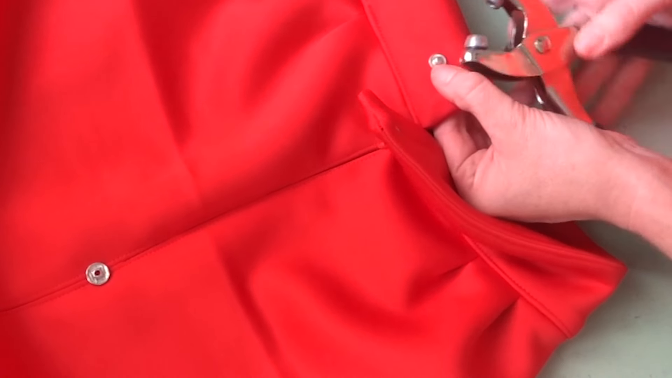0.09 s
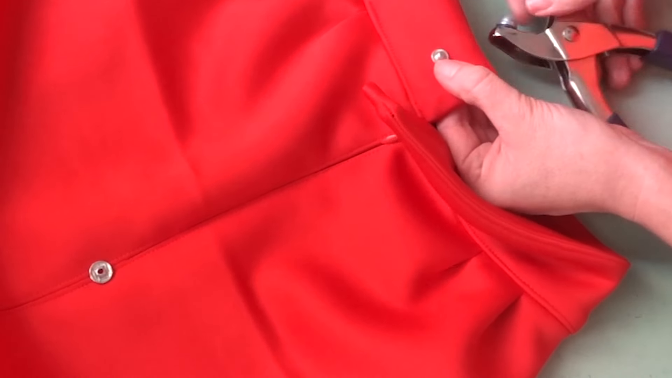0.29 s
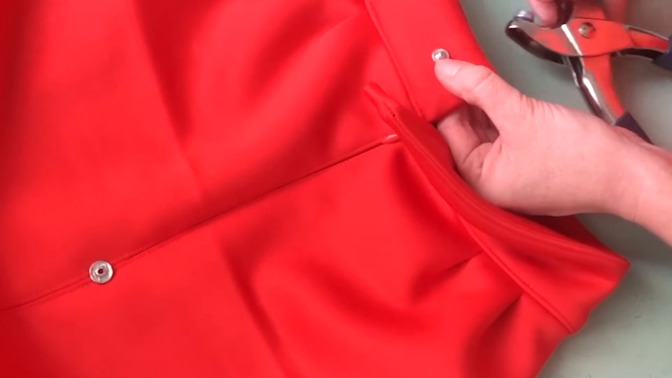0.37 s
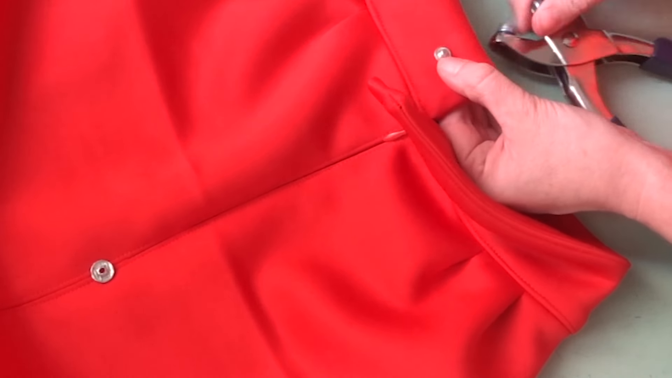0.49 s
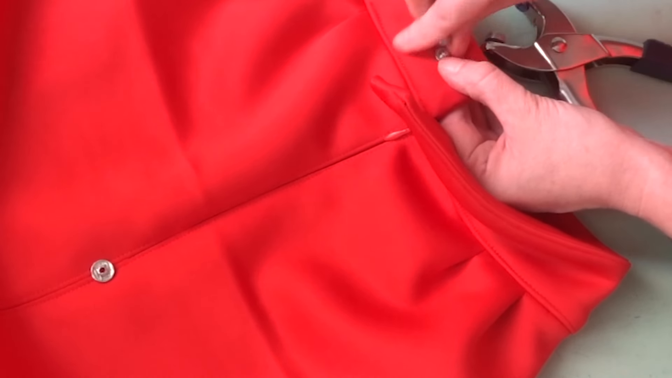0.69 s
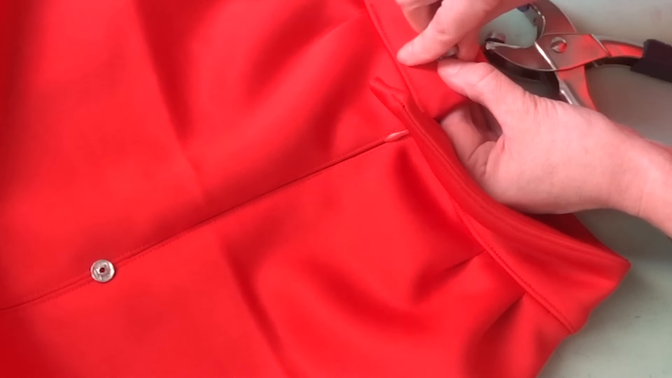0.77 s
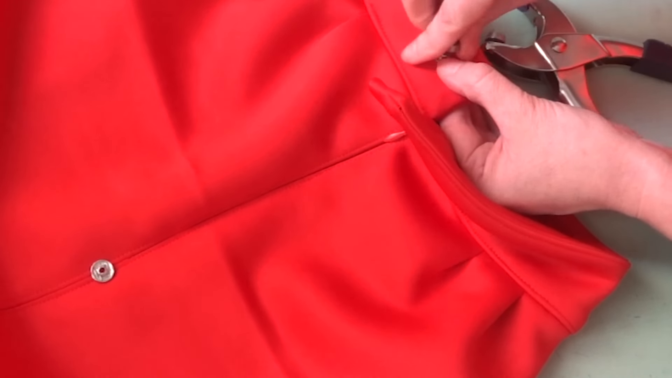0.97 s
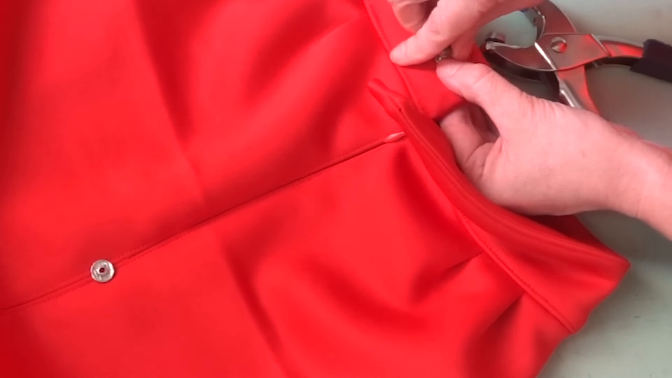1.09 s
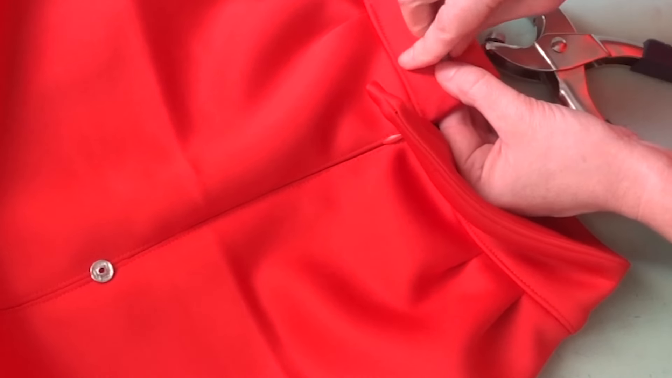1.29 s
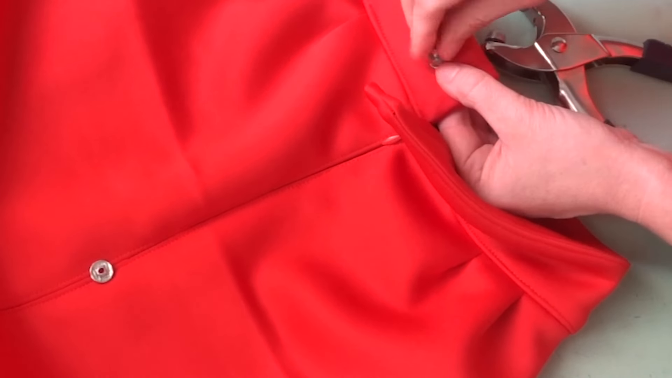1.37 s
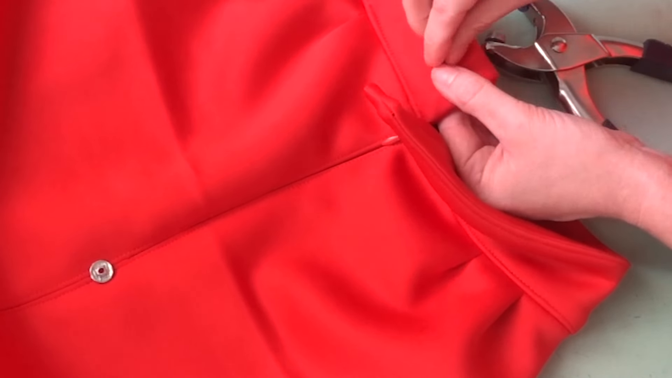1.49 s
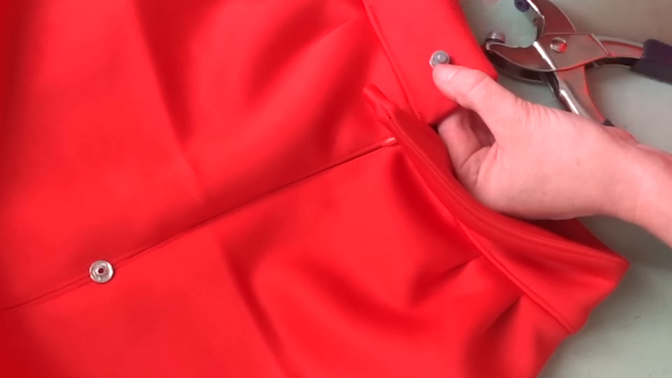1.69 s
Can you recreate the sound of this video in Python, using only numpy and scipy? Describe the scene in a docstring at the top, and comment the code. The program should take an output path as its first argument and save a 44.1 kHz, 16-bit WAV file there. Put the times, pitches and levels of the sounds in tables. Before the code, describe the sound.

Snap pliers give two hard metallic clacks and a heavier knock, then fingers rub neoprene.

```python
"""Close stereo pair at a table in a small, bare room. From the start a quiet air and hum lie under dull garment shifts
and fingers stroking neoprene, made of coloured noise, fibre grains and a rubbing resonance; loose metal ticks faintly.
Snap pliers then give two hard clacks and, laid down, a heavier knock: each is a contact, a crack,
reflections, ringing table, room and steel modes, and a noise tail. A soft hand bump and more strokes follow."""
import sys
import numpy as np
from scipy import signal
from scipy.fft import rfft, irfft, next_fast_len
from scipy.io import wavfile
from scipy.ndimage import uniform_filter1d

SR = 44100
rng = np.random.default_rng(int(sys.argv[2]) if len(sys.argv) > 2 else 0)


def dump_mix(stems):
    """Bounce the given channels to the path in sys.argv[1] as a 16-bit WAV at rate SR."""
    frames = np.atleast_2d(stems).T  # one column per channel
    limited = np.clip(frames, -1, 1)  # hard clip at full scale
    pcm = np.round(limited * 32767).astype(np.int16)
    wavfile.write(sys.argv[1], SR, pcm)


N = 77175


def undb(db):
    """Decibels to gain."""
    return 10 ** (np.asarray(db) / 20)


def unit(x):
    """Scale to an energy of 1."""
    return x / np.sqrt(np.sum(x ** 2) + 1e-18)


def level(x, db):
    """Scale to an rms level."""
    return x * undb(db) / np.sqrt(np.mean(x ** 2))


def level_50ms(x, db):
    """Scale a short event from energy 1 to the given rms level over 50 ms."""
    return x * undb(db) * np.sqrt(SR / 20)


def colour(x, points):
    """Causal minimum-phase filter through (Hz, dB) points, by folding the cepstrum."""
    size = 2 * next_fast_len(len(x))
    hz, db = np.array(sorted(points), float).T
    f = np.maximum(np.arange(size // 2 + 1) * SR / size, 1)
    gain = undb(np.interp(np.log(f), np.log(hz), db))
    cepstrum = irfft(np.log(gain))
    cepstrum[1:size // 2] *= 2
    cepstrum[size // 2 + 1:] = 0
    response = np.exp(rfft(cepstrum))
    return irfft(rfft(x, size) * response)[:len(x)]


def resonate(x, hz, width):
    """One resonance with gain 1 at its centre; width in Hz."""
    b, a = signal.iirpeak(hz, hz / width, SR)
    return signal.lfilter(b, a, x)


def lowpass(x, order, hz):
    """Dull a sound above a corner frequency."""
    b, a = signal.butter(order, hz, fs=SR)
    return signal.lfilter(b, a, x)


def stereo(mid, side):
    """Two close microphones: most alike in the bass, unrelated in the treble."""
    # side against mid: f/Hz, level/dB
    side_colour = [(30, -10), (120, -26), (300, -23.5), (600, -18), (1400, -9), (2500, -5), (5000, -4),
                   (9000, 0.5), (15000, 0)]
    side = colour(side, side_colour)
    return np.array([mid + side, mid - side])


def add(out, x, start):
    """Mix a sound in at its time."""
    i = int(start * SR)
    out[:, i:] += x[:, :N - i]


def noise():
    """White noise."""
    return rng.standard_normal(N)


def fall(t, t60):
    """Decay by 60 dB in t60, flat before time 0."""
    return undb(-60 * np.maximum(t, 0) / t60)


def room_tone():
    """Quiet air as coloured noise, and a low hum that wavers because it is narrow-band noise."""
    # colour of the air: f/Hz, level/dB per Hz
    air_colour = [(25, -6), (50, -6.5), (140, -3), (200, -1.5), (380, -2.5), (620, -3.5), (900, -19),
                  (1700, -24.5), (3000, -17.5), (5000, -16.5), (7000, -22.5), (15000, -31)]
    # hum bands: f/Hz, width/Hz of each of two filter passes, level/dB
    hum_bands = [(68.1, 6.2, -75), (201.5, 41, -65)]
    air_db = -64
    mid, side = (level(colour(noise(), air_colour), air_db) for _ in range(2))
    hum = np.zeros(N)
    for hz, width, db in hum_bands:
        band = resonate(resonate(noise(), hz, width), hz, width)
        hum += level(band, db)
    return stereo(mid + hum, side)


def fabric(t):
    """Garment shifts and cloth strokes: pressure shapes fibre grains in a hiss, with one rubbing resonance each."""
    # strokes of fingers and tool: start t/s, rise t/s, hold t/s, release t/s (to fall 30 dB),
    # level/dB at full pressure before flicker, rub f/Hz, rub level/dB and fibre brightness/dB against the hiss
    strokes = [(0.029, .035, 0.04, 0.31, -59, 1240, -5.5, -26),
               (0.182, .015, 0.034, 0.12, -56.5, 1220, -15, -21),
               (0.734, 0.028, 0.033, .12, -65, 7100, -4, -8),
               (0.959, 0.014, 0.067, 0.18, -57, 1580, -3.5, -18),
               (1.022, 0.018, 0.029, .15, -62, 1510, -4, -19),
               (1.05, 0.025, 0.015, .15, -48.5, 1350, -10.5, -17.5),
               (1.157, .015, 0.059, 0.33, -66, 3500, -14, -5.5),
               (1.185, 0.056, .035, 0.17, -60, 2100, 5, -17),
               (1.252, .025, 0.03, 0.29, -66.5, 5170, 2.5, 0),
               (1.51, 0.041, .02, 0.097, -59, 2080, 5.5, -12.5),
               (1.544, 0.023, 0.078, 0.26, -66, 3220, -6.5, -12.5),
               (1.72, .028, .02, .1, -48, 1174, 11, -23)]
    # colour of the cloth: f/Hz, level/dB per Hz
    cloth_colour = [(150, -21.5), (500, -7), (1300, -2), (2500, -3), (4000, -4), (6500, -12.5),
                    (10000, -18.5), (15000, -36.5)]
    # dull shifting of the garment on the table: t/s, level/dB
    shift_levels = [(0, -59.5), (.04, -61), (.07, -56), (.22, -57), (.5, -55), (.82, -56.5), (.96, -61),
                    (1.28, -61), (1.4, -65), (1.62, -61.5), (1.75, -66)]
    # colour of the shifting: f/Hz, level/dB per Hz
    shift_colour = [(100, -50.5), (200, -9), (330, -6.5), (550, -1.5), (1200, -7), (2000, -16.5),
                    (5000, -32.5)]
    rub_width = 0.073  # as a fraction of the rub frequency
    grains_per_s, grain_db = 850, -9  # rms level against the hiss noise
    fibre_hz, fibre_width_hz = 9300, 7500  # bright hiss, the width of each of two filter passes
    flicker_db = 1.3  # rms swing

    # two averages of 500 samples (11 ms) leave a slow random swing
    slow = uniform_filter1d(uniform_filter1d(noise(), size=500), size=500)
    flicker = undb(flicker_db * level(slow, 0))
    shift_gain = undb(np.interp(t, *np.array(shift_levels).T))
    parts = []
    for _ in range(2):  # mid, then side
        grains = level(noise() * (rng.random(N) < grains_per_s / SR), grain_db)
        hiss = level(colour(noise() + grains, cloth_colour), 0)
        rub_source = colour(noise(), cloth_colour)
        fibres = resonate(noise() + grains, fibre_hz, fibre_width_hz)
        fibres = resonate(fibres, fibre_hz, fibre_width_hz)
        total = level(colour(noise(), shift_colour), 0) * shift_gain
        for start, rise, hold, release, db, hz, rub_db, bright_db in strokes:
            pressure = np.clip((t - start) / rise, 0, 1) ** 1.47
            pressure = pressure * fall(t - start - rise - hold, 2 * release)
            rub = level(resonate(rub_source, hz, hz * rub_width), rub_db)
            stroke = level(hiss + rub + level(fibres, bright_db), db)
            total = total + pressure * flicker * stroke
        parts.append(total)
    return stereo(*parts)


def ticks(t):
    """Tiny contacts of loose metal: a noise burst and short room tail through one resonance each."""
    # ticks: t/s, level/dB over 50 ms, ring f/Hz, width/Hz
    tick_list = [(0.070, -84, 4600, 1200), (0.1286, -71, 10800, 350), (0.188, -73, 1500, 3000),
                 (0.4512, -64, 10200, 4000), (0.4654, -74, 10800, 4000), (0.5295, -64, 5300, 1500)]
    contact_s = 0.00061  # time constant
    room_db, room_t60_s = 4.5, 0.44  # tail envelope energy against the contact's
    shape = unit(np.exp(-t / contact_s)) + undb(room_db) * unit(fall(t, room_t60_s))
    out = np.zeros((2, N))
    for start, db, hz, width in tick_list:
        mid, side = (unit(resonate(noise() * shape, hz, width)) for _ in range(2))
        add(out, level_50ms(stereo(mid, side), db), start)
    return out


def ring(t, modes):
    """Decaying modes of random phase that swell over a few milliseconds."""
    swell_s = 0.0019  # time constant
    tones = np.zeros(N)
    for hz, db, t60 in modes:
        tones += undb(db) * fall(t, t60) * np.sin(2 * np.pi * (hz * t + rng.random()))
    return unit(tones * (1 - np.exp(-t / swell_s)))


def room_tail(t, hold, t60):
    """Dense echoes as noise that builds up, holds and dies away over a longer, duller late tail."""
    build_s = 0.0016  # time constant
    late_db, late_t60_s, late_damp_hz = -15.5, 0.55, 1210  # level before damping
    late = undb(late_db) * fall(t, late_t60_s) * lowpass(noise(), 1, late_damp_hz)
    return unit((1 - np.exp(-t / build_s)) * (noise() * fall(t - hold, t60) + late))


def crack(t, delay):
    """The bright crack of a contact: a brief high-passed noise burst."""
    crack_s, crack_hz = 0.001, 3550  # time constant, lower limit
    b, a = signal.butter(2, crack_hz, "high", fs=SR)
    burst = (t >= delay) * np.exp(-abs(t - delay) / crack_s)
    return unit(signal.lfilter(b, a, noise() * burst))


def pliers(t):
    """Each blow is a contact with a bright crack, early reflections, ringing modes and a dense room tail."""
    # blows: t/s, level/dB over 50 ms, contact level/dB before its lowpass, contact treble limit f/Hz,
    # tail hold t/s, tail t60/s, table and room modes level/dB, steel modes level/dB,
    # crack level/dB against the tail, crack delay t/s
    blows = [(0.2450, -18.5, -7.5, 9000, 0.014, 0.24, -2.5, -6, -0.5, 0.00038),
             (0.3780, -25.5, -2, 6030, 0.0098, 0.21, -6, -10, -1, 0),
             (0.568, -15, -6, 1480, 0.031, 0.27, 2, -10, -20, 0.019)]
    # one colour per blow: f/Hz, level/dB per Hz
    blow_colours = [
        [(50, -39), (110, -20), (190, -9.5), (390, -11.5), (510, 1.5), (780, -7), (1150, 0.5), (2000, -4),
         (2700, -10), (4100, -14.5), (5400, -29), (8000, -34), (15000, -43)],
        [(50, -47), (100, -22), (160, -4.5), (390, -6.5), (540, 1.5), (850, -4.5), (1300, -0.5), (2100, -11.5),
         (2900, -18.5), (5500, -32), (8000, -42), (10200, -36.5), (15000, -57.5)],
        [(40, -37.5), (90, -30.5), (185, -9), (250, -18), (390, -18), (470, -4.5), (720, 1), (1100, -4.5),
         (1700, -6), (2500, -19), (3500, -21.5), (5000, -30), (7500, -34.5), (15000, -43)],
    ]
    # resonances of table and room: f/Hz, level/dB before the blow's colour, t60/s
    room_modes = [(163, -7, .18), (214, 3, .29), (450, -1, .19), (510, 1, .21), (540, -6, .19),
                  (624, -4, .34), (703, 0, .22), (780, -5, .25), (857, -2, .24), (994, 2, .22),
                  (1070, 3, .21), (1239, -1, .25)]
    # resonances of the steel jaws: f/Hz, level/dB, t60/s
    steel_modes = [(1459, -1, .22), (1513, -3, .2), (1648, -2, .16), (1716, -5, .2), (1929, -7, .24),
                   (2180, -7, .14), (2255, -7, .24), (2775, -15, .22), (2945, -10, .11), (3494, -19, .2),
                   (3693, -17, .18)]
    # early reflections from table and walls: delay t/s, level/dB against the room tail
    reflections = [(.0024, -15), (.0095, -13), (0.011, -15), (0.0159, -16), (.036, -14.5)]
    flex_hz, flex_width_hz = 1300, 1200

    out = np.zeros((2, N))
    impulse = signal.unit_impulse(N)
    echoes = np.zeros(N)
    for delay, db in reflections:
        echoes[int(delay * SR)] += undb(db)
    for blow, tone in zip(blows, blow_colours):
        start, db, contact_db, contact_hz, hold, t60, room_db, steel_db, crack_db, crack_delay = blow
        contact = undb(contact_db) * lowpass(impulse, 2, contact_hz) + echoes
        # an all-pass: the bending table smears each contact around this pitch
        contact = contact - 2 * resonate(contact, flex_hz, flex_width_hz)
        mid, side = (room_tail(t, hold, t60) + undb(crack_db) * crack(t, crack_delay) for _ in range(2))
        mid, side = colour(mid + contact, tone), colour(side, tone)
        size = np.sqrt(np.sum(mid ** 2))
        room = undb(room_db) * unit(colour(ring(t, room_modes), tone))
        steel = undb(steel_db) * ring(t, steel_modes)
        mid = mid / size + room + steel
        blow_sound = stereo(mid, side / size) / np.sqrt(np.sum(mid ** 2))
        add(out, level_50ms(blow_sound, db), start)
    return out


def bump(t):
    """Soft bump of a hand on the table: a decaying noise burst through a low resonance, alike in both channels."""
    # the bump: t/s, level/dB over 50 ms, f/Hz, width/Hz of each of two filter passes, t60/s of the burst
    hand_bump = (0.722, -58, 170, 130, .16)
    start, db, hz, width, t60 = hand_bump
    burst = noise() * (t > start) * fall(t - start, t60)
    thud = resonate(resonate(burst, hz, width), hz, width)
    return level_50ms(unit(thud), db)


def scene():
    """Room, cloth, ticks, pliers and bump in front of the pair, a touch to the left."""
    t = np.arange(N) / SR
    balance_db = 0.44  # left against right
    balance = undb(np.array([[balance_db], [-balance_db]]) / 2)
    return (room_tone() + fabric(t) + ticks(t) + pliers(t) + bump(t)) * balance


def record(dry):
    """The recorder cuts the top with a steep elliptic lowpass."""
    top_hz = 15450
    sos = signal.ellip(10, .2, 70, top_hz, fs=SR, output="sos")  # ripple and stopband in dB
    return signal.sosfilt(sos, dry)


dry = scene()
out = record(dry)
dump_mix(out)
```